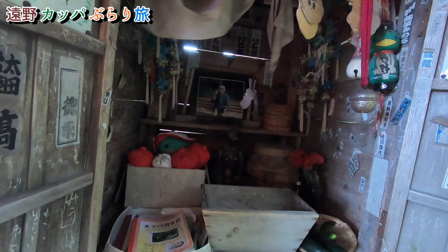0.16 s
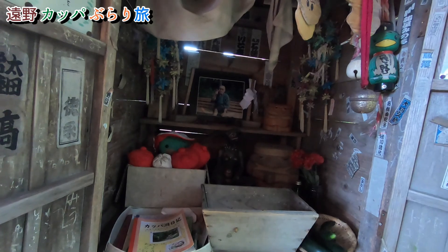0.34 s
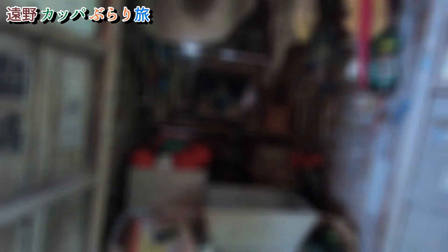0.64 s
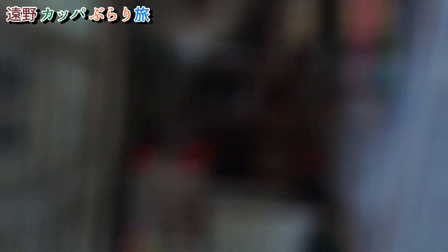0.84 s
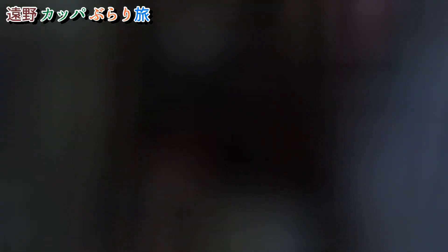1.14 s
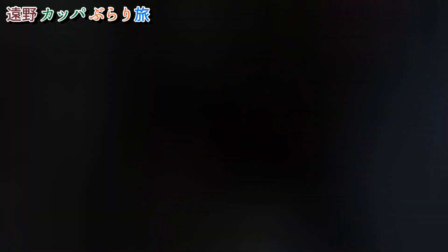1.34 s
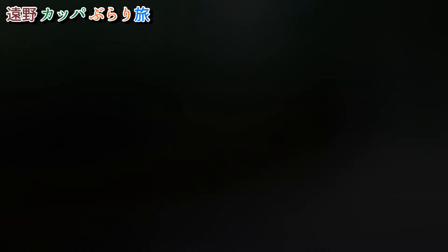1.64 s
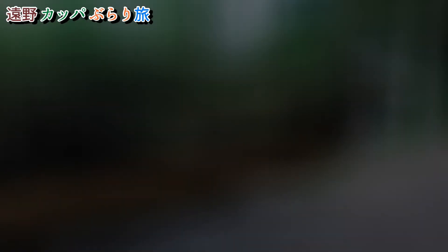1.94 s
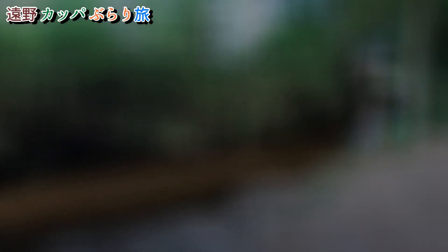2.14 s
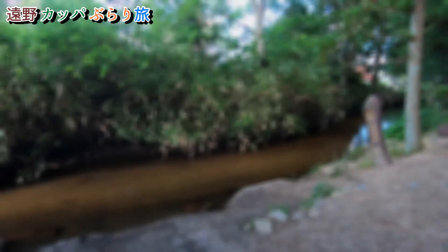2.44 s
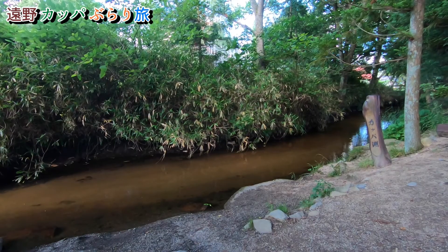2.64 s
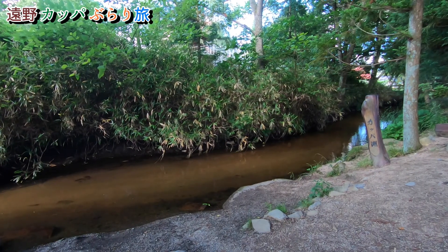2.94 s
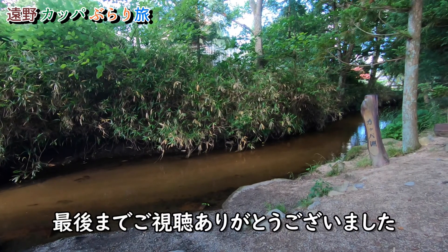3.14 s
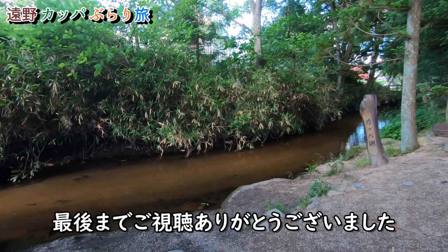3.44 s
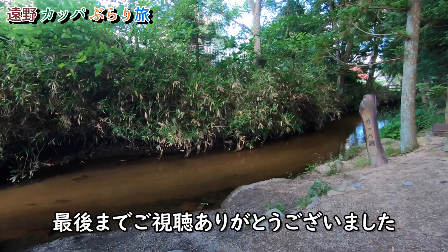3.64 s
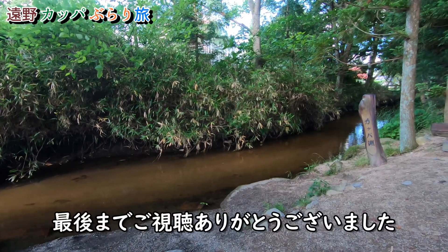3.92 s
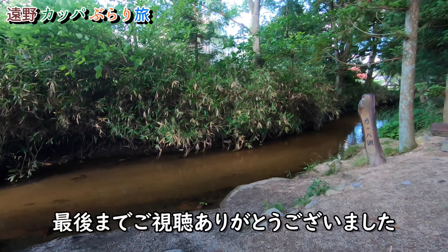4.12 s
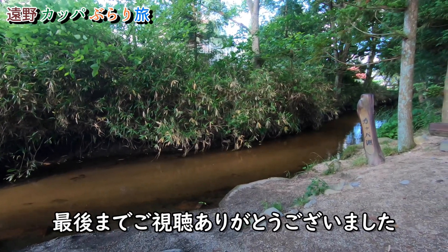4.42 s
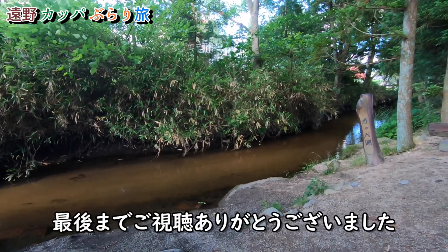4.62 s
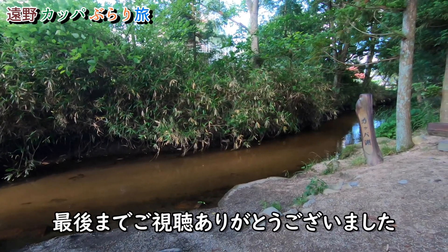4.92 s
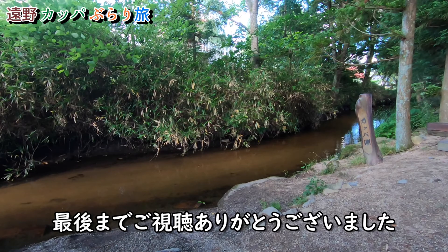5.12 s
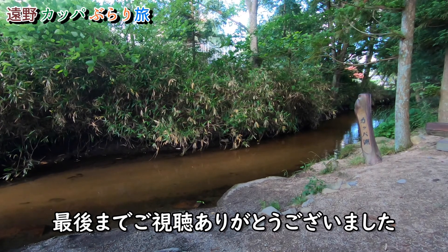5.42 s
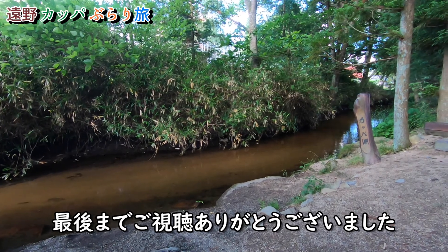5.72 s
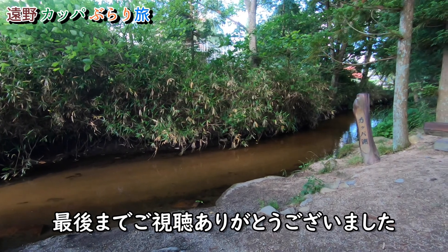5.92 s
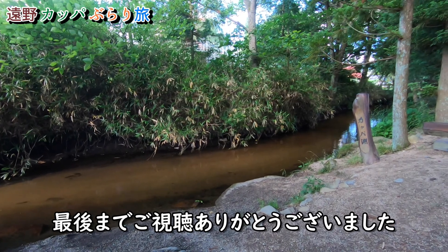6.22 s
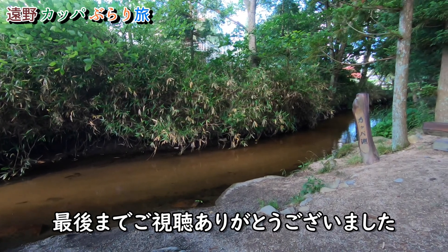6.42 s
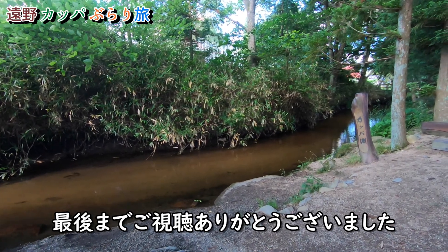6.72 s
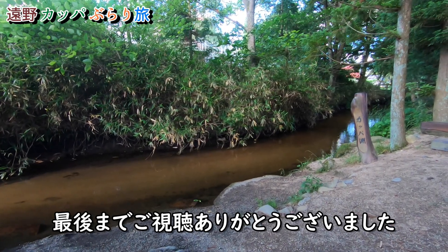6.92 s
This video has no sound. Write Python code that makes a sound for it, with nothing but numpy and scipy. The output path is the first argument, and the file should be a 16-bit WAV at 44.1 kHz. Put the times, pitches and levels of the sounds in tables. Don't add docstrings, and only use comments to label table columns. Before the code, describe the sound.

From 0 to 1.45 s, beside a wooden shed, a distant cicada chorus makes a trembling, shrill wall near 8 kHz, over low wind buffeting the microphone and a faint air floor. A small ringing tap comes at 1.4 s, then sound drops abruptly to silence. From about 1.6 to 1.7 s a stream bank fades in quickly. The chorus is now fuller, with added high fizz growing after 2 s, above soft water hiss. One nearer cicada buzzes, its clicking quickening as its ring loosens, sputtering out near 3.65 s. An evening cicada throbs roughly ten times a second around 4 kHz, swelling to strongest at 3-4.5 s, then easing but continuing to 7 s. Dull taps at 2.2 and 3.6 s and small ringing drips around 4.4-4.55 s dot the scene. Wind lulls near 4.2 s, pushes hardest around 5.8 s, and gusts at 6.8 s. Nearly mono.

```python
import sys
import numpy as np
from scipy import signal
from scipy.fft import rfft, irfft, next_fast_len
from scipy.io import wavfile
from scipy.ndimage import uniform_filter1d, map_coordinates

SR = 44100
rng = np.random.default_rng(int(sys.argv[2]) if len(sys.argv) > 2 else 0)


def magnitude_from_level(level_db):
    exponent = np.asarray(level_db, float) / 20
    return 10 ** exponent


def generate_wav(sig):
    pcm = np.round(np.clip(np.atleast_2d(sig).T, -1, 1) * 32767).astype(np.int16)
    wavfile.write(sys.argv[1], SR, pcm)


N = 311346
CUT_S = 1.5
TOP_HZ = 15750


def unit(x):
    return x / np.sqrt(np.mean(x ** 2) + 1e-20)


def ramp(span_s):
    return np.interp(np.arange(N) / SR, span_s, [0, 1])


def curves(rows):
    time_s, *columns = np.transpose(rows)
    return [np.interp(np.arange(N) / SR, time_s, column) for column in columns]


def wobble(rate_hz):
    coarse = np.arange(0, N + 32, 32)
    knots = rng.standard_normal(int(N * rate_hz / SR) + 4)
    return np.interp(np.arange(N), coarse, map_coordinates(knots, [coarse * rate_hz / SR]))


def filtered(x, response):
    size = next_fast_len(N + SR // 10, True)
    hz = np.fft.rfftfreq(size, 1 / SR)
    spectrum = rfft(x, size) * response(hz) * (hz < TOP_HZ)
    return unit(irfft(spectrum, size)[:N])


def coloured(x, spectrum):
    point_hz, db = np.transpose(spectrum)
    return filtered(x, lambda hz: magnitude_from_level(np.interp(np.log(hz + 1), np.log(point_hz + 1), db)))


def resonant(x, modes):
    def response(hz):
        total = 0
        for mode_hz, width_hz, db in modes:
            band = 1j * hz * width_hz
            total = total + magnitude_from_level(db) * (band / (mode_hz * mode_hz - hz * hz + band)) ** 2
        return total
    return filtered(x, response)


def rush(patchy_db):
    cells = signal.stft(rng.standard_normal(N), nperseg=512)[2]
    patches = uniform_filter1d(rng.standard_normal(cells.shape), 6, 0)
    patches = uniform_filter1d(patches, 14, 1)
    return unit(signal.istft(cells * magnitude_from_level(patchy_db * unit(patches)), nperseg=512)[1][:N])


def clicks(rate_hz, jitter, scatter_db):
    count = np.cumsum(rate_hz / SR) + jitter * wobble(300)
    whole = np.floor(np.maximum.accumulate(count))
    return unit((np.diff(whole, prepend=0) > 0) * magnitude_from_level(scatter_db * rng.standard_normal(N)))


def crowd(singers, blur_db):
    near = 0
    for rate_hz, db in singers:
        train = clicks(rate_hz * (1 + .002 * wobble(8)), .003, 1.5)
        near = near + magnitude_from_level(db + 1.8 * wobble(3.5)) * train
    return unit(near) + magnitude_from_level(blur_db) * rush(patchy_db=1.3)


def chorus(at_bank):
    # time_s, shrill_db
    shrill = [(0, -45), (.7, -46), (1.05, -47.5), (1.44, -46), (1.75, -44), (2.6, -41.5), (3.8, -41),
              (5, -42), (7.06, -41)]
    # rate_hz, level_db
    shed_singers = [(431.2, 0), (405, -9), (268, -9)]
    bank_singers = [(501.4, 0), (410, -3), (288, -5), (184, -6), (813, -6)]
    # freq_hz, density_db_per_hz
    shed_body = [(3290, -55), (5600, -28.5), (6160, -26.5), (6220, -19), (6570, -15), (6680, -13.5),
                 (7740, -3.5), (7990, 1), (8440, -3.5), (8900, -9.5), (9060, -15), (9500, -21.5),
                 (10500, -33.5), (13600, -63.5), (22000, -120)]
    bank_body = [(2940, -66), (5000, -30), (5450, -20.5), (5910, -10.5), (6550, -11), (6760, -5.5),
                 (7820, 3.5), (8340, 1), (8850, -7.5), (9220, -18.5), (10500, -33), (13600, -75),
                 (22000, -120)]
    fizz_body = [(6000, -36), (9000, 2.5), (10000, -2.5), (11000, -6), (12300, -5.5), (13200, -14.5),
                 (14200, -20.5), (15700, -21)]
    fizz_shed_db, fizz_start_db, fizz_full_db = -66.5, -73, -59.5
    join_s, sway_db, tremble_hz = (2, 2.45), .6, 66.8

    shrill_db, = curves(shrill)
    fizz_bank_db = fizz_start_db + (fizz_full_db - fizz_start_db) * ramp(join_s)
    fizz_db = np.where(at_bank, fizz_bank_db, fizz_shed_db)
    tremble = 1 + 0.15 * np.sin(2 * np.pi * tremble_hz * np.arange(N) / SR)
    shed = coloured(tremble * crowd(shed_singers, blur_db=8.0), shed_body)
    bank = crowd(bank_singers, blur_db=1.5)
    fizz = magnitude_from_level(fizz_db + 0.85 * wobble(8.3)) * coloured(bank, fizz_body)
    wall = np.where(at_bank, coloured(bank, bank_body), shed)
    return magnitude_from_level(shrill_db + 2.0 + sway_db * wobble(4.14)) * wall + fizz


def evening_singer():
    # time_s, effort_db, high_over_low_db
    effort = [(1.75, -23, 6), (2.2, -19, 11), (2.5, -13.5, 9), (2.8, -2.5, 7), (3.2, 0, 6.5), (3.8, 0, 4),
              (4.6, -1, 6.5), (5.4, -3, -4), (6.1, -4, -4), (6.5, -7.5, -6), (7.06, -7, -3)]
    # time_s, pitch_hz
    pitch = [(1.7, 4150), (2.3, 4190), (2.6, 4280), (3.1, 4320), (4, 4280), (5, 4240), (5.9, 4250),
             (6.3, 4170), (7.06, 4180)]
    # multiple, level_db
    overtones = [(.5, -10), (1, -2), (1.5, -11.5), (2, -9.5)]
    # freq_hz, density_db_per_hz
    rasp_body = [(3000, -43), (3450, -25), (3750, -3), (3950, -4.5), (4040, 5), (4130, 1), (4240, 3.5),
                 (4340, -3.5), (4450, -15), (4800, -15), (5600, -41)]
    half_body = [(1600, -57), (1880, -8), (1980, -2), (2080, 7.5), (2190, -2.5), (2280, -16), (2600, -31)]
    first_throb_s, throbs_hz, extra_throbs, slowing_s = 1.79, 9.24, 3.3, 1.4
    low_hz, mid_hz, low_follows = 4030, 4240, .2
    tone_db, tone_grows, throb_scatter_db = -45.5, 0.91, -0.5
    throb_depth, calm_per_db = .75, 0.9
    arch_hz, rasp_arch_hz, lag_turns = 50, 55, .15
    rasp_db, half_db, half_grows = -45.5, -54.5, 0.57

    since_s = np.arange(N) / SR - first_throb_s
    turn = throbs_hz * since_s + extra_throbs * (1 - np.exp(-since_s / slowing_s))
    turn = np.maximum(turn, -1)

    def swell(lag):
        return (.5 + .5 * np.cos(2 * np.pi * (turn - lag))) ** 1.66

    throb = swell(0)
    effort_db, lead_db = curves(effort)
    high_hz, = curves(pitch)
    depth = np.clip(throb_depth + calm_per_db * np.minimum(effort_db + 8, 0), 0, 1)
    low_track_hz = low_hz + low_follows * (high_hz - mid_hz)
    tones = 0
    for hz, side, waver_hz in ((low_track_hz, -.5, 8), (high_hz, .5, 20)):
        bend_hz = (side > 0) * arch_hz * (throb - .5)
        phase = 2 * np.pi * np.cumsum(hz + bend_hz + waver_hz * wobble(60)) / SR
        each = np.interp(turn, np.arange(60), rng.standard_normal(60))
        db = tone_db + tone_grows * effort_db + side * lead_db + throb_scatter_db * each
        voice = sum(magnitude_from_level(overtone_db) * np.sin(k * phase) for k, overtone_db in overtones)
        tones = tones + magnitude_from_level(db) * (1 - depth + depth * swell(side * lag_turns)) * voice

    scratch = rush(patchy_db=1.17)
    place = np.cumsum(((high_hz + rasp_arch_hz * (throb - .4)) / 4260) ** .7)
    whole = map_coordinates(coloured(scratch, rasp_body), [place], mode="wrap")
    half = map_coordinates(coloured(scratch, half_body), [place], mode="wrap")
    rasp = magnitude_from_level(rasp_db + effort_db) * unit(1.8 + throb) * whole
    rasp += magnitude_from_level(half_db + half_grows * effort_db) * unit(1.4 + throb) * half

    echo_s = np.arange(SR // 2) / SR
    echo = rng.standard_normal(SR // 2) * magnitude_from_level(-60 * echo_s / .25)
    smear = signal.fftconvolve(tones, echo / np.linalg.norm(echo))[:N]
    return tones + rasp + magnitude_from_level(-5) * smear


def buzzer():
    # time_s, clicks_hz
    glide = [(1.6, 570), (1.8, 578), (2.05, 590), (2.3, 600), (2.7, 609), (3.2, 617), (3.56, 618),
             (3.64, 596), (3.67, 590)]
    # freq_hz, width_hz, level_db
    tight_body = [(6330, 380, -2), (6650, 500, 0), (6745, 60, -3), (7200, 700, -6)]
    slack_body = [(4950, 120, -20), (5490, 280, -4), (6070, 380, 0)]
    tight_db, slack_db, tight_holds, slack_grows = -39, -42.5, 1.55, 1.0
    sputter_s, sputter_jitter, stop_s = (3.58, 3.64), 0.25, (3.61, 3.71)

    rate_hz, = curves(glide)
    slack = (rate_hz - rate_hz.min()) / np.ptp(rate_hz)
    beat = clicks(rate_hz * (1 + .005 * wobble(120)), sputter_jitter * ramp(sputter_s), 3.5)
    scrape = rng.standard_normal(N)
    tight_gain = magnitude_from_level(tight_db) * np.cos(np.pi / 2 * slack ** tight_holds)
    tight = tight_gain * resonant(beat + 1.6 * scrape, tight_body)
    loose = magnitude_from_level(slack_db) * slack ** slack_grows * resonant(beat + 0.85 * scrape, slack_body)
    return magnitude_from_level(0.56 * wobble(27.98)) * (1 - ramp(stop_s)) * (tight + loose)


def ticks():
    # start_s, peak_db, pitch_hz, t60_s
    taps = [(1.389, -47, 2280, 0.06), (1.389, -54, 1510, .07), (1.390, -50, 3850, 0.08),
            (1.390, -53, 4800, .06), (1.392, -54, 3100, 0.08), (1.391, -55, 5700, 0.04),
            (2.221, -44, 1700, .007), (2.221, -43, 2700, 0.0073), (3.586, -37, 1050, 0.0052),
            (3.718, -53, 3100, .04), (3.97, -54, 2900, .04), (4.419, -45, 3250, .07),
            (4.420, -51, 2770, .11), (4.438, -48, 3450, 0.08), (4.549, -53, 3200, 0.06),
            (4.56, -53, 2780, 0.11), (5.84, -59, 1250, .05)]
    out = np.zeros(N + SR)
    t = np.arange(SR // 10) / SR
    draws = rng.standard_normal((len(taps), 2, 6, 1))
    for (start_s, db, hz, t60_s), (spread, start) in zip(taps, draws):
        ring = np.sin(2 * np.pi * hz * (1 + 0.03 * spread) * t + .8 * start).sum(axis=0)
        onset = 1 - np.exp(-t / 0.00032)
        out[round(start_s * SR):][:len(t)] += magnitude_from_level(db - 8.0 - 60 * t / t60_s) * ring * onset
    return out[:N]


def wind():
    # time_s, strength_db
    strength = [(0, -44.5), (.15, -42.5), (.55, -40.5), (.75, -45), (1.0, -49), (1.3, -44.5), (1.75, -44.5),
                (2.3, -49), (2.7, -54), (3.4, -46.5), (3.85, -46), (4.2, -70), (4.5, -60), (4.8, -48),
                (5.3, -46), (5.8, -37), (6.5, -52.5), (7.06, -44)]
    # time_s, buffet_lift_db
    gusts = [(.13, 11), (0.499, 1.5), (1.1, 7), (1.43, 9.5), (2.03, 7.5), (2.9, 6), (3.23, 7), (3.39, 8),
             (4.83, 4.5), (5.0, 6), (5.43, 6.5), (5.76, 5), (6.76, 14)]
    # freq_hz, density_db_per_hz
    buffet_body = [(8.8, -36), (15, -4), (44, 2), (102, -8.5), (130, -9.5), (170, -36.5), (290, -120)]
    flutter_body = [(41, -23), (70, 0.5), (178, -5), (265, -14.5), (423, -27.5), (471, -33.5), (600, -43),
                    (780, -67), (1320, -120)]
    gust_s = 0.034
    flutter_at_db, flutter_shed_db, flutter_bank_db = -46.5, -44.5, -56
    flutter_grows, flutter_gusts = 0.75, .6

    strength_db, = curves(strength)
    t = np.arange(N) / SR
    gust_db = sum(db * np.exp(-((t - s) / gust_s) ** 2) for s, db in gusts)
    flutter_db = np.where(t > CUT_S, flutter_bank_db, flutter_shed_db)
    flutter_db = flutter_db + flutter_grows * (strength_db - flutter_at_db)
    lumps = magnitude_from_level(2.4 * wobble(18))
    flutter = unit(lumps * coloured(rng.standard_normal(N), flutter_body))
    buffet = unit(lumps * coloured(rng.standard_normal(N), buffet_body))
    return magnitude_from_level(strength_db + gust_db) * buffet + magnitude_from_level(flutter_db + flutter_gusts * gust_db) * flutter


def air(at_bank):
    # time_s, level_db
    water = [(1.75, -55), (3.8, -52.5), (5.2, -54.5), (7.06, -52.5)]
    # freq_hz, density_db_per_hz
    stream_body = [(30, 21.5), (115, 19), (170, 13), (350, 2), (560, -7.5), (700, -1.5), (1050, -8.5),
                   (1500, 1.5), (1900, 3), (2600, 0), (3500, 0.5), (5200, 0), (9000, -0.5), (15700, -35)]
    shed_air = [(250, -19.5), (450, -15.5), (600, -4.5), (850, 1), (1050, -6.5), (1500, 2), (2200, -2),
                (3000, -5.5), (4200, -6.5), (6000, -3.5), (10000, -6), (12000, -16), (15700, -18)]
    # freq_hz, width_hz, shed_db, bank_db
    hums = [(113.6, 31, -65.5, -64.5), (735, 26, -80, -78), (1666, 36, -74, -78.5)]
    hiss = rush(patchy_db=1.5)
    stream = magnitude_from_level(curves(water)[0]) * coloured(hiss, stream_body)
    floor = np.where(at_bank, stream, magnitude_from_level(-62.0) * coloured(hiss, shed_air))
    for hz, width_hz, shed_db, bank_db in hums:
        hum = resonant(rng.standard_normal(N), [(hz, width_hz, 0)])
        floor += magnitude_from_level(np.where(at_bank, bank_db, shed_db)) * hum
    return floor


def apart(at_bank):
    # start_s, length_s, level_db
    spells = [(.29, 0.3, -80), (1.244, 0.091, -79), (2.178, .42, -68), (2.97, 0.096, -64),
              (4.353, .81, -71.5), (5.402, 0.44, -72.5)]
    # freq_hz, density_db_per_hz
    treble_body = [(10600, -36.5), (11200, -9.5), (12400, -2.5), (13500, -8.5), (14500, -15.5),
                   (15700, -24)]
    broad_body = [(30, -2.5), (150, 4.5), (500, -12), (1000, -24.5), (2050, -1.5), (3000, -9), (5500, -1.5),
                  (7000, 2), (8000, -6.5), (10000, -6), (11500, -52)]
    shed_db, bank_db, quiet_db, opens_s = -77, -72, -88, (2.3, 2.65)

    t = np.arange(N) / SR
    treble_db = np.where(at_bank, quiet_db + (bank_db - quiet_db) * ramp(opens_s), shed_db)
    broad = magnitude_from_level(quiet_db) + sum(magnitude_from_level(db) * (t > s) * (t < s + length_s) for s, length_s, db in spells)
    noise = rng.standard_normal(N)
    return magnitude_from_level(treble_db) * coloured(noise, treble_body) + broad * coloured(noise, broad_body)


def scene():
    at_bank = np.arange(N) / SR > CUT_S
    mid = chorus(at_bank) + at_bank * (evening_singer() + buzzer())
    mid = mid + ticks() + wind() + air(at_bank)
    side = apart(at_bank)
    return np.array([mid + side, mid - side])


def band_limit(x):
    return signal.sosfilt(signal.butter(12, 16080, fs=SR, output="sos"), x)


def record(dry):
    fade_out = 1 - ramp((1.4485, 1.4505))
    fade_in = np.sin(np.pi / 2 * ramp((1.607, 1.725))) ** 2.06
    return band_limit(dry * (fade_out + fade_in))


dry = scene()
out = record(dry)
generate_wav(out)
```